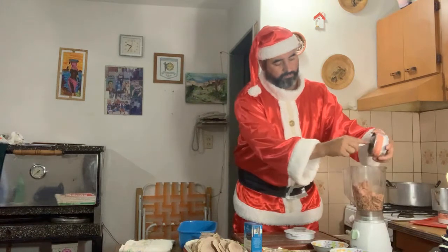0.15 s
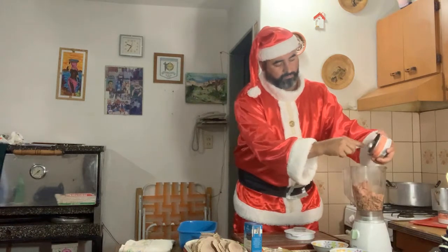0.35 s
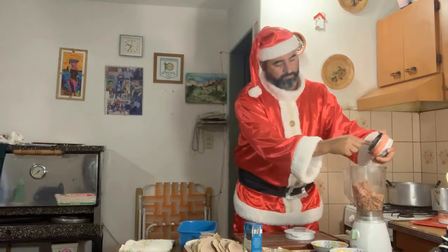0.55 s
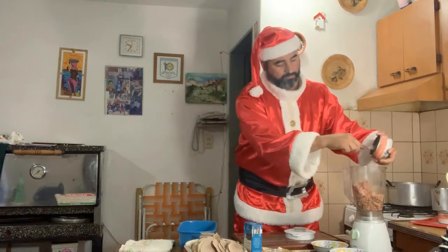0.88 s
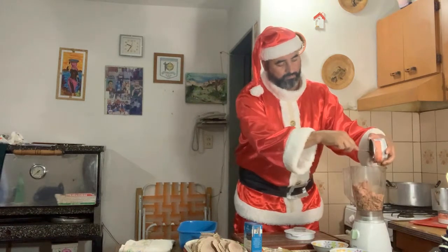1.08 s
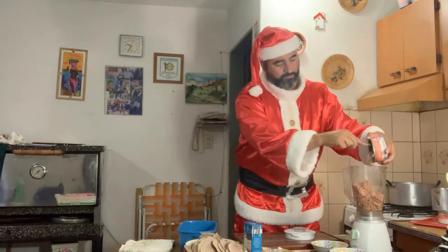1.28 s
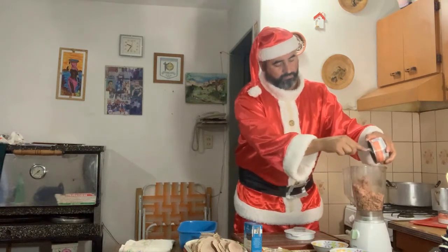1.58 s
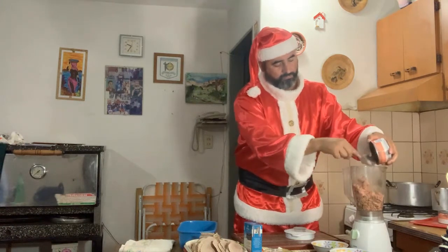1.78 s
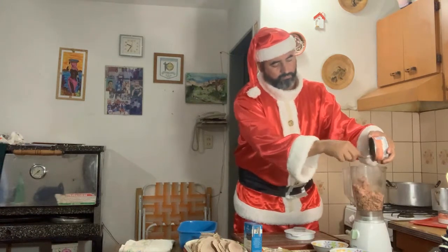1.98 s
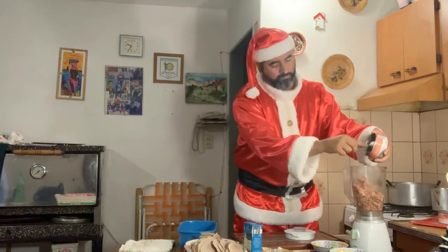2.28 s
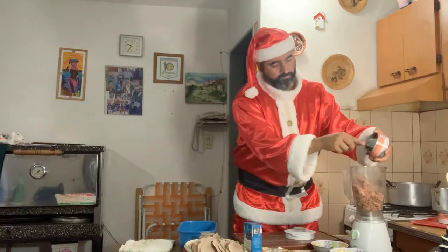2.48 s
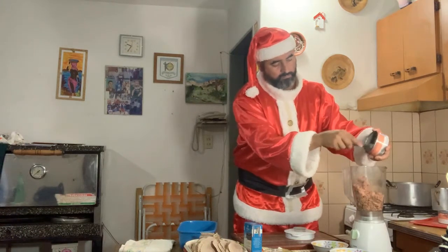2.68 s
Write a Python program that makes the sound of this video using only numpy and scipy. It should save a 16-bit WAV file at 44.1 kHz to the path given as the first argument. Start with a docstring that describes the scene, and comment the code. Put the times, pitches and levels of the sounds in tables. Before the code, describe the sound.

A metal spoon taps and scrapes inside a tin can: three ringing knocks with gritty scrapes, a soft scrape on food, quieter quick scrapes, then one hard rim knock, in a tiled kitchen a few steps from the microphone.

```python
"""A metal spoon taps and scrapes inside a hand-held tin can in a tiled kitchen, a few steps from the microphone.
A quiet low room tone with a wavering hum, made of noise, runs throughout; the kitchen adds a half-second tail.
First come taps and scrapes on bottom and seam, with a tap on the food, then a lone scrape on the food.
Quick taps and scrapes on side and wall follow, and last a hard tap and scrape on the rim.
Each blow rings the can's modes, weighted by the place struck; strokes feed gritty noise into the same modes."""
import sys
import numpy as np
from scipy import signal
from scipy.fft import rfft, irfft, next_fast_len
from scipy.io import wavfile
from scipy.ndimage import uniform_filter1d

SR = 44100
rng = np.random.default_rng(int(sys.argv[2]) if len(sys.argv) > 2 else 0)


def dump(signal):
    """Clip the signal to [-1, 1] and save it as 16-bit WAV at the path in sys.argv[1]."""
    limited = np.clip(np.atleast_2d(signal).T, -1, 1)
    pcm = np.round(limited * 32767).astype(np.int16)
    wavfile.write(sys.argv[1], SR, pcm)


def ratio(d):
    """dB to gain"""
    e = np.asarray(d, float) / 20
    return 10 ** e


N = 125685  # length in samples

# the places the spoon touches
BOTTOM, SEAM, FOOD, WALL, RIM, EDGE, SIDE = range(7)


def evened(x):
    """Scales to rms 1."""
    return x / np.sqrt(np.mean(x ** 2) + 1e-20)


def read(points, hz):
    """Reads a spectrum table on a log frequency axis."""
    f, value = np.transpose(points)
    return np.interp(np.log(hz + 1), np.log(f + 1), value)


def add(mix, start_s, sound):
    """Mixes a sound in at start_s seconds."""
    part = mix[round(start_s * SR):][:len(sound)]
    part += sound[:len(part)]


def coloured(x, points, tilt_db):
    """Filters x by a spectrum table, tilted about 3 kHz by tilt_db per octave."""
    size = next_fast_len(len(x) + 2048)
    hz = np.fft.rfftfreq(size, 1 / SR)
    colour = evened(ratio(read(points, hz)))
    tilt = ratio(tilt_db * np.log2((hz + 100) / 3000))
    return irfft(rfft(x, size) * colour * tilt, size)[:len(x)]


def resonate(x, hz, width):
    """One resonance of gain 1: shifts hz down to zero, smooths, and shifts back up."""
    turn = np.exp(2j * np.pi * hz * np.arange(len(x)) / SR)
    r = np.exp(-np.pi * width / SR)
    return 2 * (turn * signal.lfilter([1 - r], [1, -r], x / turn)).real


# Colour of the room's low noise. Each row: frequency in Hz, relative level in dB per Hz.
AIR_SPECTRUM = [(25, -53.5), (50, 4.5), (70, -37.5), (100, -8.5), (190, 3.5), (250, -9.5), (320, -0.5),
                (500, -15), (700, -10), (1000, -14), (2000, -20), (4400, -28.5), (5500, -33.5), (7000, -24),
                (8000, -45.5), (12000, -35.5), (16000, -36)]
# The wavering hum. Each row: frequency in Hz, width in Hz of each of its two filters, level in dB.
HUM = [(94.5, 9.8, -66.5), (304.5, 3.8, -70)]


def room_tone():
    """Low noise, patchy in time and pitch, plus hum made by narrow resonances on noise."""
    air_db, patchy_db = -58, 0.8
    frames, hz = N // 512 + 5, np.fft.rfftfreq(2048, 1 / SR)
    a, b, patches = rng.standard_normal((frames, 1025, 3)).T
    patches = uniform_filter1d(patches, 20, axis=0)
    patches = evened(uniform_filter1d(patches, 6, axis=1))
    spectra = (a + 1j * b) * ratio(read(AIR_SPECTRUM, hz)[:, None] + patchy_db * patches)
    air = signal.istft(spectra, nperseg=2048, noverlap=1536)[1][:N]
    tone = ratio(air_db) * evened(air)
    for hum_hz, width, db in HUM:
        narrow = resonate(rng.standard_normal(N), hum_hz, width)
        tone = tone + ratio(db) * evened(resonate(narrow, hum_hz, width))
    return tone


# How long the kitchen rings. Each row: frequency in Hz, seconds to die by 60 dB.
KITCHEN_T60 = [(300, 0.57), (1390, 0.51), (3680, 0.47), (7000, 0.42), (12000, 0.36)]


def kitchen(x):
    """Three tails of sparse random taps, bands dying at their own speeds, fed in turn, so that no tone
    lingers in one tail."""
    tail_db, gap_s = -5.5, 0.01  # the first echoes come after the gap
    turn_s = 0.04  # the feeds pass from one tail to the next about this often
    out, at = x, np.arange(0, SR - 12, 12)
    for k in range(3):
        taps = np.zeros(SR)
        taps[at + rng.integers(0, 12, len(at))] = rng.choice([-1., 1.], len(at))
        taps[:round(gap_s * SR)] = 0
        hz, t, z = signal.stft(taps, SR, nperseg=256)
        fade = ratio(-60 * t / read(KITCHEN_T60, hz)[:, None])
        tail = signal.istft(z * fade, SR, nperseg=256)[1]
        # the squares of the three feeds always add up to 1
        feed = np.sqrt(2 / 3) * np.cos(np.pi * (np.arange(N) / SR / turn_s + k) / 3)
        out = out + ratio(tail_db) * signal.fftconvolve(x * feed, tail / np.linalg.norm(tail))[:N]
    return out


# Dense modes of the sheet metal as the microphone colours them.
# Each row: frequency in Hz, relative level in dB per Hz.
SHEET_SPECTRUM = [(120, -32), (300, -18), (900, -12), (1600, -11.5), (2500, -7), (4100, -5.5),
                  (4700, -12.5), (5500, -6.5), (7400, -9.5), (8600, -18.5), (11600, -25), (15200, -29),
                  (16500, -62)]


def sheet(t60, tilt_db):
    """The dense modes of the sheet metal after one tap: coloured noise that dies fast."""
    t = np.arange(SR // 5) / SR
    return coloured(rng.standard_normal(len(t)), SHEET_SPECTRUM, tilt_db) * ratio(-60 * t / t60)


# The can's modes, one number each: frequency in Hz.
MODE_HZ = [295, 452, 476, 492, 808, 955, 1109, 1152, 1211, 1300, 1435, 1708, 1960, 2095, 2320, 2600, 2765,
           2930, 3130, 3850, 4020, 4210, 5530, 6950, 7250]
# One number per mode: seconds to die by 60 dB, at a damping of 1.
MODE_T60 = [.08, 0.19, 0.085, 0.075, 0.12, 0.13, 0.21, 0.21, 0.14, 0.095, 0.091, 0.064, 0.086, 0.036, 0.068,
            0.038, .075, 0.048, .07, 0.077, 0.081, 0.046, 0.079, 0.088, 0.094]
# How strongly each place excites each mode. Each row: a place, then one relative level in dB per mode.
PLACE_MODES_DB = { BOTTOM: [-20, -24, -48.5, -32, -20, -20.5, -12, -4, 3, -29.5, -22.5, -5.5, -17.5, -9.5,
                  -11.5, -10, -36, -11, -11.5, -24, -19.5, -16, -18, -28.5, -22], SEAM: [-21, -20.5, -32,
                  -37, -23.5, -25, -13.5, -5.5, 0.5, -23, -27, -8, -25.5, -0.5, -17.5, -23.5, -26, -12, -17,
                  -15, -24, -3.5, -14, -25.5, -14], FOOD: [-34, -18, -35, -25, -21, 3.5, 2, -13.5, 7.5, 1.5,
                  5, -19.5, -23, 12, -8, 11.5, -17, -14.5, -12.5, 5, -20, -26, -36, -13, -27], WALL: [-28.5,
                  -8.5, -20, 1, -18, -24, -8, -10, -4, 3, -4, -10, -10, -13, -2.5, -7.5, -6, -29.5, -1, -9,
                  -10.5, -21, -11, -6.5, -8], RIM: [-40, -42, -40, -37.5, -18, -41, -13, -6.5, -1, -0.5, 1,
                  -17.5, -1.5, -25, -22, -32.5, -6, -7.5, -11.5, -18.5, -15.5, -26, -15.5, -15.5, -11.5],
                  EDGE: [-24.5, -12.5, -21, -20, -18, -17, -5.5, -15, -7, -8, -7, -19, -15.5, -18, -17,
                  -15.5, -23, 1, -11, -23.5, -4.5, -25, -12.5, -7, -21.5], SIDE: [-39, -20, 2, -24, -10,
                  -16.5, -7, -18.5, -3, 1.5, -2, -15, -8, -4, 1.5, 3.5, -5, -20, -13, -3.5, 1.5, -23.5,
                  -25.5, -20, -25]}


def ring(place, tilt_db, damping, spread_db, detune):
    """The can's answer to one sharp tap at a place; the grip shifts each mode a little."""
    t, hz = np.arange(SR // 5)[:, None] / SR, np.array(MODE_HZ)
    louder, sharper = rng.standard_normal((len(hz), 2)).T
    level = ratio(PLACE_MODES_DB[place] + tilt_db * np.log2(hz / 1200) + spread_db * louder)
    fade = ratio(-60 * t * damping / MODE_T60)
    waves = np.sin(2 * np.pi * hz * (1 + detune * sharper) * t)
    return (level * fade * waves).sum(1) / np.linalg.norm(level)


def slipping(count):
    """The spoon's slips: random clicks of very unequal size, gathered in clumps."""
    slips_per_s, size_spread_db = 6000, 2.2
    clump_db, clump_s = 2.5, 0.005
    luck, size, sign, stray, lump = rng.random((SR // 4, 5))[:count].T
    clumps = ratio(clump_db * evened(uniform_filter1d(lump - .5, round(clump_s * SR))))
    sizes = ratio(-size_spread_db * np.log(size + 0.0021))
    slips = evened(clumps * (luck < slips_per_s / SR) * sizes * (sign - .5))
    return slips, stray


# Where the slips are split into bands, mostly an octave wide: each number a frequency in Hz.
SPLITS_HZ = [700, 1400, 2800, 5600]


def stroke(place, start, turning, end, touch_db, ring_db, grit_db, tilt_db):
    """Clumped slips cross patches of metal that ring differently; pressure opens the treble band by band."""
    lift_db = -7  # pressure left at the end
    bright_power = 0.6  # each higher band follows pressure more steeply
    patches, patch_blur = 4, 0.25  # blur as a share of the stroke
    t = np.arange(round((end - start) * SR)) / SR + start
    press = ratio(np.interp(t, [start, turning, end], [touch_db, 0, lift_db]))
    slips, stray = slipping(len(t))
    lows = [signal.lfilter(*signal.butter(2, hz, fs=SR), slips) for hz in SPLITS_HZ]
    lows = [0] + lows + [slips]
    drive = 0
    for k in range(len(lows) - 1):
        drive = drive + press ** (1 + bright_power * k) * (lows[k + 1] - lows[k])
    patch = np.floor(((t - start) / (end - start) + patch_blur * stray) % 1 * patches)
    out = 0
    for k in range(patches):
        # patches differ more than blows do
        modes = ring(place, 0, damping=1.88, spread_db=4, detune=0.008)
        grit = sheet(0.024, tilt_db)
        body = ratio(ring_db) * modes / np.linalg.norm(modes) + ratio(grit_db) * grit / np.linalg.norm(grit)
        out = out + signal.fftconvolve(drive * (patch == k), body)
    return start, out


# The scrapes, listed by place. Each row: start in seconds, turning point of the pressure in seconds,
# end in seconds, starting pressure in dB against the turning point, ring in dB, grit in dB,
# tilt of the grit in dB per octave.
STROKES = {BOTTOM: [(.155, .25, 0.31, -4, -43, -34.5, -1), (.525, .62, .66, 0, -38.5, -40, 2.5)],
           SEAM: [(.81, .915, .94, -3, -39, -33.5, 0.5)], FOOD: [(1.29, 1.342, 1.387, -10, -39, -45, -5)],
           WALL: [(1.908, 1.93, 1.96, -5.5, -36.5, -48.5, -9.5), (1.94, 2.0, 2.04, 1, -45.5, -48, 3)],
           RIM: [(2.355, 2.375, 2.42, -14.5, -28.5, -21.5, -0.5)], EDGE: [],
           SIDE: [(1.643, 1.66, 1.70, -3.5, -41, -39.5, -4.5)]}


def scrapes(can):
    """Lays every scrape at its place and time, so the grit excites that place's modes."""
    for place in STROKES:
        for row in STROKES[place]:
            add(can, *stroke(place, *row))


def blow(place, start_s, ring_db, clatter_db, tilt_db, clatter_tilt_db):
    """Ringing modes plus a short clatter of the sheet metal, both rising over the contact time."""
    contact_s, clatter_t60_s = 0.00063, 0.075
    modes = ring(place, tilt_db, damping=0.92, spread_db=1.5, detune=0.002)
    sound = ratio(ring_db) * modes + ratio(clatter_db) * sheet(clatter_t60_s, clatter_tilt_db)
    rise = 1 - np.exp(-np.arange(len(sound)) / SR / contact_s)
    return start_s, rise * sound


# The taps, listed by place. Each row: start in seconds, ring in dB, clatter in dB,
# tilt of the ring in dB per octave, tilt of the clatter in dB per octave.
BLOWS = {BOTTOM: [(.1527, -9, -23, -1.25, -3), (.5213, -9, -25, 0.089, 0)],
         SEAM: [(.8067, -11, -22.5, 0.0056, 2.5)], FOOD: [(.606, -25, -29, -11.5, 1.5)],
         WALL: [(1.9286, -23, -25, -1.33, -3), (1.976, -29, -38, -0.91, -0.5)],
         RIM: [(2.345, -35, -44, 0, 6), (2.3555, -5, -17.5, 0, 1.5)], EDGE: [(.4865, -50, -33, 5.5, -4),
         (.783, -42, -38.5, 3.5, -1.5), (2.2985, -30, -38, 1, 0.5)], SIDE: [(1.634, -40, -49.5, -3.5, -8),
         (1.6455, -25, -45.5, -3, -8.5), (1.997, -31, -33.5, 11.5, -0.5)]}


def taps(can):
    """Lays every tap at its place and time, so the blow excites that place's modes."""
    for place in BLOWS:
        for row in BLOWS[place]:
            add(can, *blow(place, *row))


def scene():
    """The can excited at each place, heard through the kitchen, over the room tone."""
    can = np.zeros(N)
    scrapes(can)
    taps(can)
    # a small can radiates little bass below 125 Hz
    can = signal.lfilter(*signal.butter(2, 125, "high", fs=SR), can)
    return (room_tone() + kitchen(can))[None]


def band_limit(x):
    """A steep low-pass at the top of the band."""
    return signal.sosfilt(signal.butter(12, 16950, fs=SR, output="sos"), x)


def record(dry):
    """The microphone has a narrow dip, and a small constant offset is added."""
    notch_hz, notch_width_hz, notch_depth = 8050, 400, 0.7
    offset = -0.00075
    x = dry[0] - notch_depth * resonate(dry[0], notch_hz, notch_width_hz)
    return band_limit((x + offset)[None])


dry = scene()
out = record(dry)
dump(out)
```